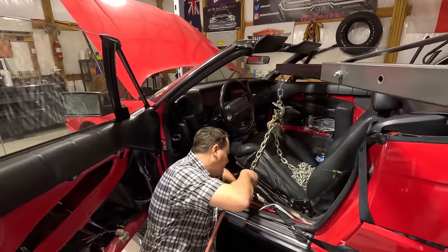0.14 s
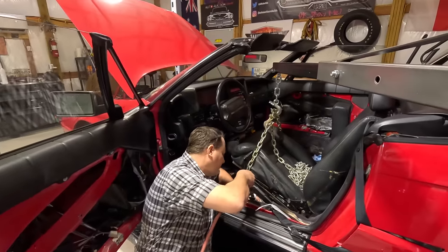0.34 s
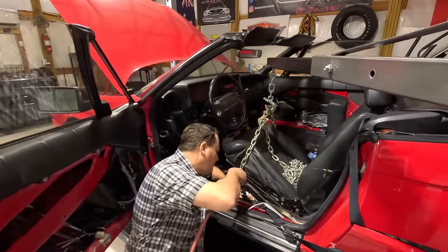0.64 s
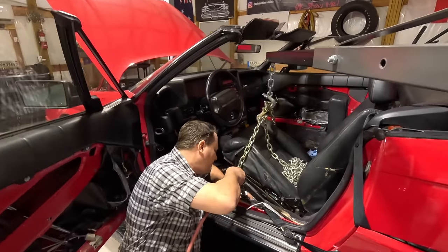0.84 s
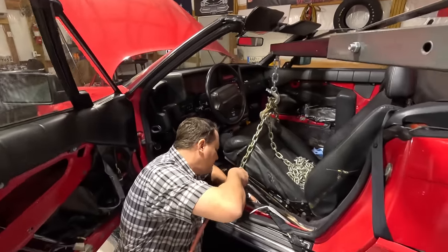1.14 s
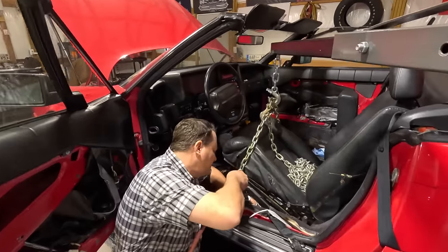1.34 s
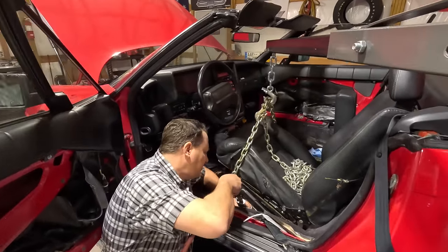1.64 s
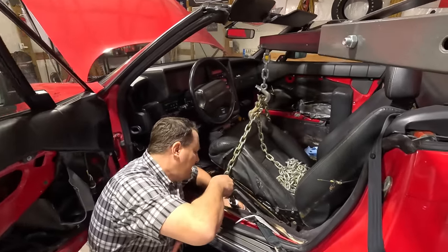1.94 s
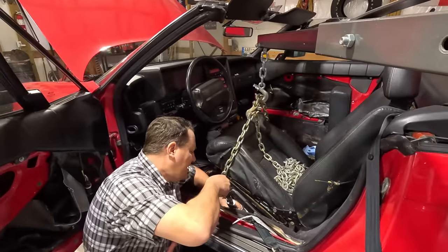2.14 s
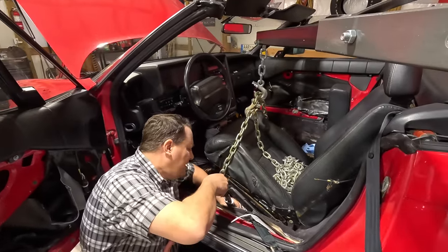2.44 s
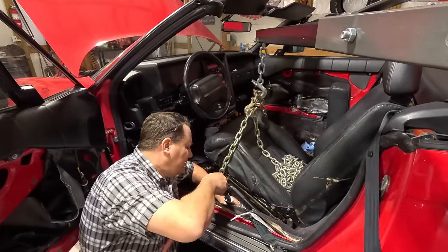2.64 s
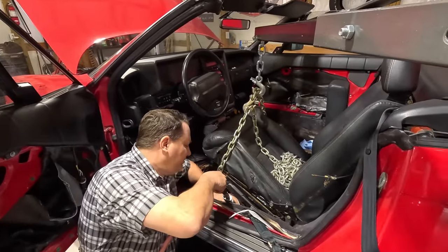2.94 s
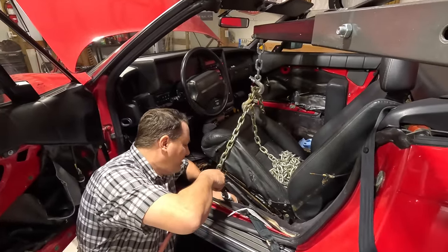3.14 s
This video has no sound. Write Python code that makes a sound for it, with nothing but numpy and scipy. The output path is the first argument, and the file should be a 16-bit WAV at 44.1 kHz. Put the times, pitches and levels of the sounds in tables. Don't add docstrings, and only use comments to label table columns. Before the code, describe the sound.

Compressed-air hammer rattles in a short airy burst, then a long metallic one, inside a car.

```python
import sys
import numpy as np
from scipy import signal
from scipy.fft import rfft, irfft
from scipy.io import wavfile

SR = 44100
rng = np.random.default_rng(int(sys.argv[2]) if len(sys.argv) > 2 else 0)


def int16_out(signal):
    q = np.round(np.clip(np.atleast_2d(signal).T, -1, 1) * 32767)
    wavfile.write(sys.argv[1], SR, q.astype(np.int16))


def how_loud(loudness_db):
    steps = np.asarray(loudness_db, float) / 20
    return 10 ** steps


N = 145530

# frequency in Hz, level in dB per Hz.
AIR_COLOUR = [(710, -17), (1200, -9.5), (1730, -4), (2020, -4.5), (2320, -5.5), (4360, -12), (10000, -6.5),
              (16000, -9)]
AIR_LOW_CUT_HZ = 6070


def rms_one(x):
    return x / np.sqrt(np.mean(x ** 2) + 1e-20)


def clicks(times_s, level_db):
    out = np.zeros(N)
    out[(np.asarray(times_s) * SR).astype(int)] = how_loud(level_db)
    return out


def ring(x, hz, t60_s):
    radius = how_loud(-60 / (t60_s * SR))
    angle = 2 * np.pi * hz / SR
    return signal.lfilter([0, np.sin(angle)], [1, -2 * radius * np.cos(angle), radius ** 2], x + 1e-18)


def soft(x, lag_s):
    r = np.exp(-1 / (lag_s * SR))
    return signal.lfilter([1 - r], [1, -r], x + 1e-18)


def swell(x, rise_s, fall_s):
    return soft(soft(x, rise_s), fall_s) * fall_s * SR


def cut(x, hz, kind):
    return signal.lfilter(*signal.butter(2, hz, kind, fs=SR), x)


def tint(x, colour):
    hz, db = np.transpose(colour)
    bins_hz = np.arange(N // 2 + 1) * SR / N
    gain = how_loud(np.interp(np.log(bins_hz + 1), np.log(hz), db, left=-80))
    return irfft(rfft(x) * rms_one(gain), N)


def hiss(colour):
    return tint(rng.standard_normal(N), colour)


def strokes():
    # time in seconds, stroke number.
    first = [(.1133, 0), (.1436, 2), (.1555, 3), (.197, 6), (.2262, 8), (.258, 10), (.2863, 12),
             (.3171, 14), (.3764, 18), (.4976, 26), (.7741, 44)]
    second = [(.9889, 0), (1.0051, 1), (1.1371, 10), (1.3149, 22), (1.4809, 33), (1.5737, 39), (1.6784, 46),
              (1.969, 65), (2.1498, 77), (2.3785, 92), (2.5909, 106), (2.7091, 114), (2.8647, 124)]
    first_hits = [0, 1, 6, 10, 12, 14, 16, 17]
    second_misses = [4, 6, 124]
    bursts_s = []
    for pace in (first, second):
        at_s, number = np.transpose(pace)
        bursts_s.append(np.interp(np.arange(pace[-1][1] + 1), number, at_s))
    hit_first = np.isin(np.arange(len(bursts_s[0])), first_hits)
    hit_second = ~np.isin(np.arange(len(bursts_s[1])), second_misses)
    times_s = np.concatenate(bursts_s)
    jitter_s = 0.0003 * rng.standard_normal(len(times_s))
    return times_s + jitter_s, np.concatenate([hit_first, hit_second])


def exhaust(times_s, hit):
    # frequency in Hz, level in dB, t60 in seconds, delay in seconds.
    modes = [(142, -1, 0.036, .0007), (175.4, -18.5, 0.34, .0007), (188, -5.5, 0.051, .0007),
             (321.6, -7, 0.042, 0.0058), (467, -7.5, 0.039, .0007), (510, -7.5, 0.0064, 0.0063),
             (756, -2, 0.027, -.0007), (884, -8, .02, .0008), (906, -5.5, 0.021, .0009)]
    spread_db = 1.6 * rng.standard_normal((len(times_s), len(modes) + 1))
    surge_db = 2 * np.exp(-(times_s - times_s[0]) / 0.078)
    port_db = -4.5 * hit
    pop = np.zeros(N)
    for k, (hz, level_db, t60_s, delay_s) in enumerate(modes):
        drive_db = port_db if k >= len(modes) - 3 else surge_db
        pop += ring(clicks(times_s + delay_s, level_db + spread_db[:, k] + drive_db), hz, t60_s)
    pop = how_loud(-4.5) * cut(cut(pop, 1340, "low"), 68, "high")
    echo_s = 0.0065
    pop += how_loud(-11.5) * cut(np.roll(pop, int(echo_s * SR)), 594, "low")

    releases = clicks(times_s + 0.001, 1.5 * spread_db[:, -1])
    bright_air = cut(hiss(AIR_COLOUR), AIR_LOW_CUT_HZ, "high")
    puff = bright_air * swell(releases, rise_s=0.0005, fall_s=0.0014)
    stream = hiss(AIR_COLOUR) * swell(releases, rise_s=0.00055, fall_s=0.014)
    return pop + how_loud(-6) * puff + how_loud(-18.5) * stream


def blows(times_s):
    # frequency in Hz, level in dB, t60 in seconds.
    steel_modes = [(1424, -7.5, 0.037), (1572, -2, 0.044), (1904, -3, 0.028), (2023, -1, .04),
                   (2523, -4, 0.038), (2715, -5, 0.067), (2905, -4.5, 0.057), (3660, -9.5, 0.054),
                   (4010, -3.5, .04), (4660, -7.5, 0.02), (5380, -11, 0.012), (6300, -9, .012),
                   (7330, -2, 0.0087), (8800, -12, .01)]
    # frequency in Hz, level in dB, t60 in seconds.
    pan_modes = [(61, 1, 0.081), (351.6, -2, 0.066), (526, -2.5, 0.078), (640, 5, 0.012),
                 (1163, 0.5, 0.033)]
    # frequency in Hz, level in dB per Hz.
    crack_colour = [(410, -42), (700, -10.5), (1940, 7), (2240, 5.5), (2800, 5), (3200, 2), (6320, 4),
                    (16000, -5.5)]
    delay_s, rebound_s, rise_s, fall_s = 0.001174, 0.0066, 0.0014, 0.0051
    opening = (np.diff(times_s, prepend=0) > 0.1) * (np.diff(times_s, append=9) < 0.1)
    blow_db = 0.6 * rng.standard_normal(len(times_s)) - 9 * opening
    train = clicks(times_s + delay_s, blow_db)
    train += clicks(times_s + delay_s + rebound_s, blow_db - 10)

    shape = swell(np.eye(1, 1500)[0], rise_s, fall_s)
    fresh = swell(train, rise_s, fall_s) * rng.standard_normal(N)

    def contact(same_share):
        scrape = shape * rng.standard_normal(len(shape))
        same = signal.fftconvolve(train, scrape)[:N]
        return same_share * same + np.sqrt(1 - same_share ** 2) * fresh

    rattle, crack = contact(0.85), contact(0.5)
    steel = sum(how_loud(level_db - 20) * ring(rattle, hz, t60_s) for hz, level_db, t60_s in steel_modes)
    pan = sum(how_loud(level_db) * ring(train, hz, t60_s) for hz, level_db, t60_s in pan_modes)
    return how_loud(-9) * steel + how_loud(-12.5) * pan + how_loud(-5) * tint(crack, crack_colour)


def valve():
    # start in seconds, whistle level in dB, spit level in dB.
    moves = [
        (0.1082, -31, -14),
        (.806, -20.5, -13),
        (.972, -36, -48),
        (0.982, -34, -22),
        (2.898, -21, -13),
    ]
    times_s, hoot_db, spit_db = np.transpose(moves)
    hoot_hz = 880
    hoot = ring(ring(clicks(times_s, hoot_db - 24), hoot_hz, 0.008), hoot_hz, 0.045)
    bright_air = cut(hiss(AIR_COLOUR), AIR_LOW_CUT_HZ, "high")
    spit = bright_air * swell(clicks(times_s + 0.003, spit_db), rise_s=0.0008, fall_s=0.0025)
    inrush = soft(ring(clicks(0.1072, -9), 203, 0.012), 0.00018)
    return hoot + spit + inrush


def garage(x):
    t = np.arange(SR // 2) / SR
    white = rng.standard_normal(len(t))
    low = soft(white, 0.00008)
    low_t60_s, top_t60_s = 0.3, 0.2
    tail = low * how_loud(-60 * t / low_t60_s) + (white - low) * how_loud(-60 * t / top_t60_s)
    tail *= t > 0.004
    return how_loud(-19) * signal.fftconvolve(x, tail / np.sqrt(np.sum(tail ** 2)))[:N]


def background():
    # frequency in Hz, level in dB per Hz.
    leak_before = [(180, -59), (300, -16), (961, -17.5), (1720, -19), (2700, -23.5), (3830, -14),
                   (10700, -4), (16000, -9.5)]
    leak_after = [(180, -53), (300, -24), (603, -11), (701, -27), (3240, -19), (11900, -6), (13100, -18),
                  (14700, -4), (16000, -6)]
    # frequency in Hz, level in dB per Hz.
    rumble = [(15, -47), (25, -17), (92, -1), (156, -20.5), (204, -19.5), (400, -27.5), (520, -54),
              (880, -120)]
    t = np.arange(N) / SR
    leak_shift_s = 2.0
    leak = np.where(t < leak_shift_s, how_loud(-37.5) * hiss(leak_before), how_loud(-36.5) * hiss(leak_after))
    hum = rms_one(ring(rng.standard_normal(N), 590, 0.2))
    return leak + how_loud(-48.5) * hiss(rumble) + how_loud(-68.5) * hum


def scene():
    times_s, hit = strokes()
    tool = exhaust(times_s, hit) + blows(times_s[hit]) + valve()
    mid = tool + garage(tool) + background()
    side = how_loud(-41.5) * np.roll(mid, 300)
    return np.array([mid + side, mid - side])


def top_cut(x):
    return signal.sosfilt(signal.butter(12, 16740, fs=SR, output="sos"), x)


def record(dry):
    threshold_db, squeeze, release_db_per_s = -26.5, 0.82, 28
    quick_share, quick_s, attack_s = 0.63, 0.01, 0.067
    level_db = 10 * np.log10(soft(dry.mean(axis=0) ** 2, 0.015) + 1e-12)
    ahead = int(0.011 * SR)
    level_db = np.append(level_db[ahead:], np.zeros(ahead) - 99)
    over_db = squeeze * np.maximum(level_db - threshold_db, 0)
    over_db = quick_share * soft(over_db, quick_s) + (1 - quick_share) * soft(over_db, attack_s)
    ramp_db = release_db_per_s * np.arange(N) / SR
    gain_db = ramp_db - np.maximum.accumulate(over_db + ramp_db)
    x = cut(dry, 7.3, "high") * how_loud(gain_db)
    top = 0.4
    x = top * np.tanh(x / top)
    low_pass = signal.cheby2(12, 70, 16200 * 1.03, fs=SR, output="sos")
    return top_cut(signal.sosfilt(low_pass, x))


dry = scene()
out = record(dry)
int16_out(out)
```